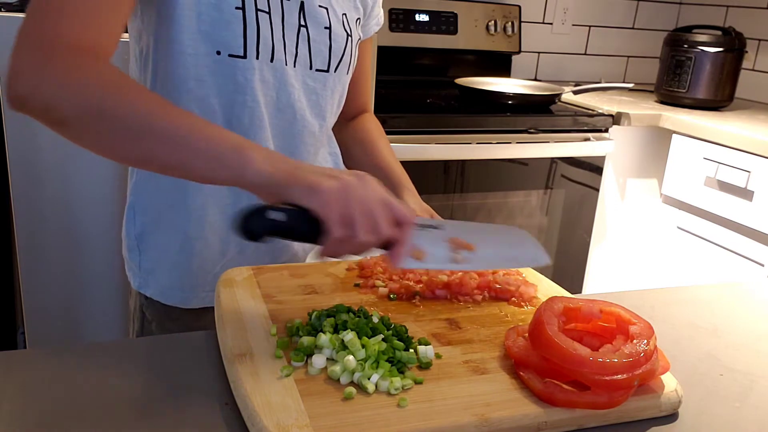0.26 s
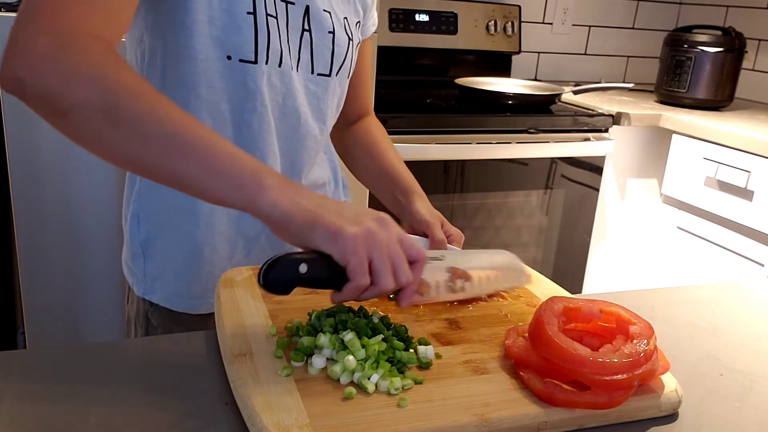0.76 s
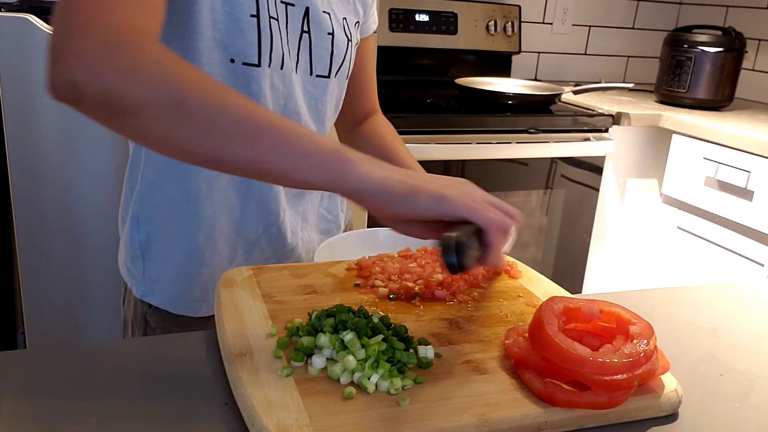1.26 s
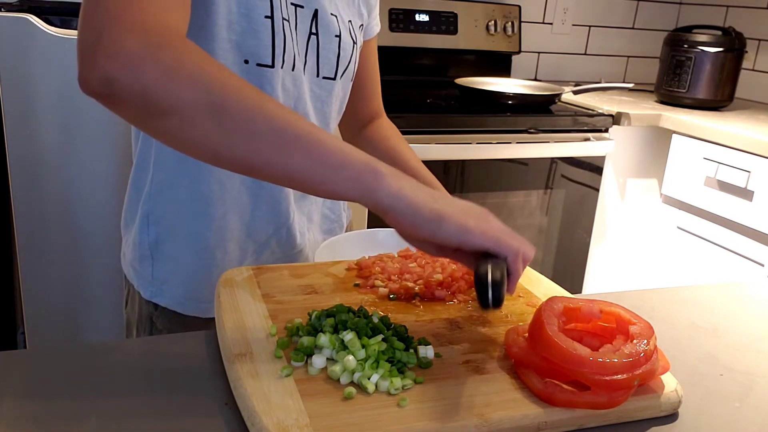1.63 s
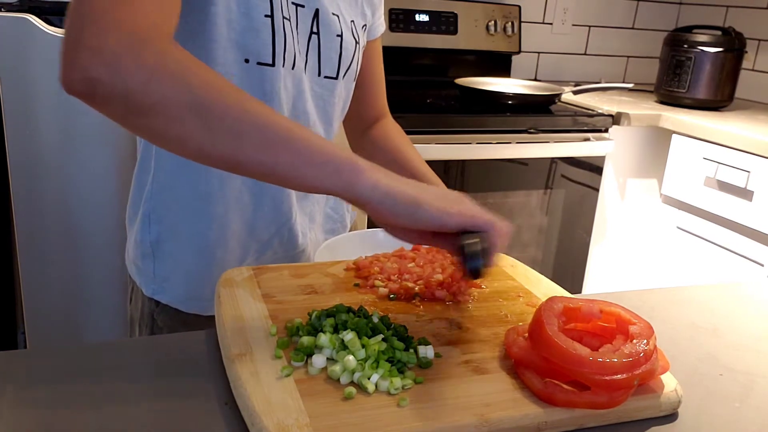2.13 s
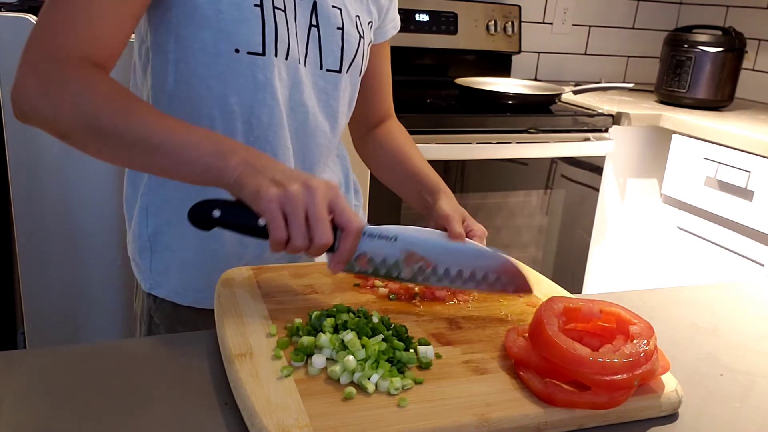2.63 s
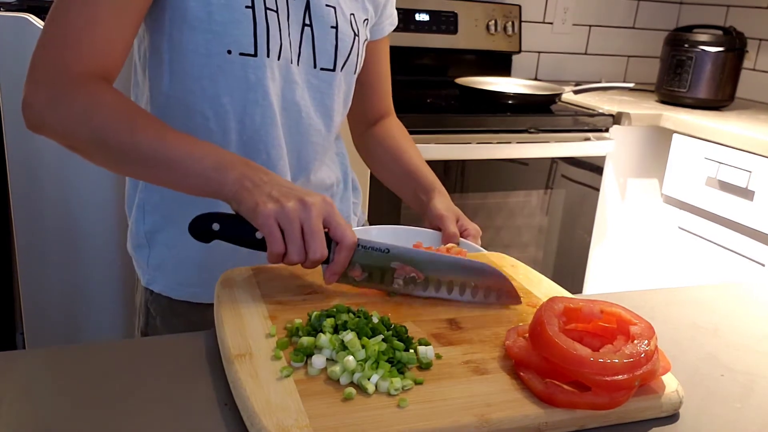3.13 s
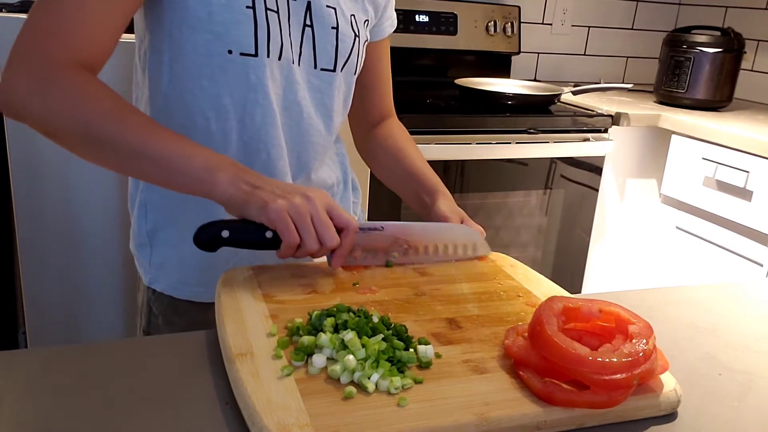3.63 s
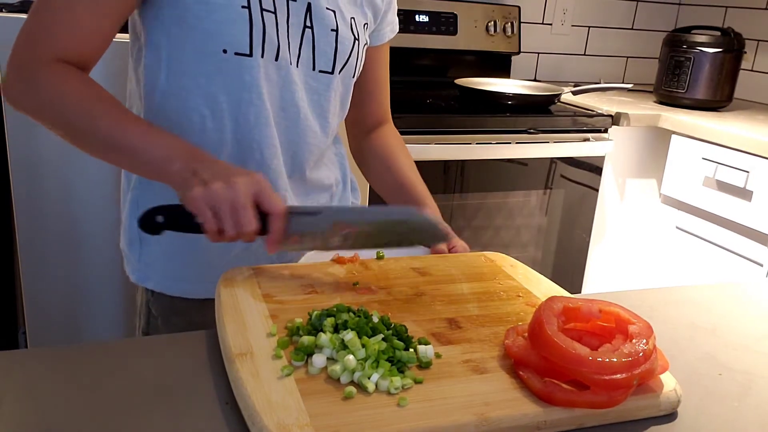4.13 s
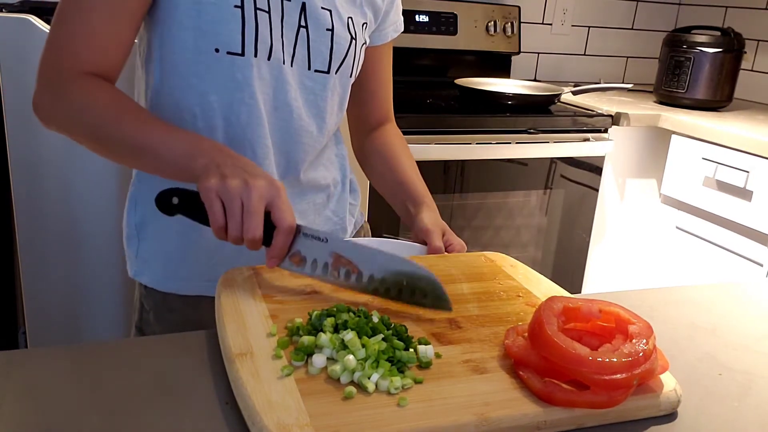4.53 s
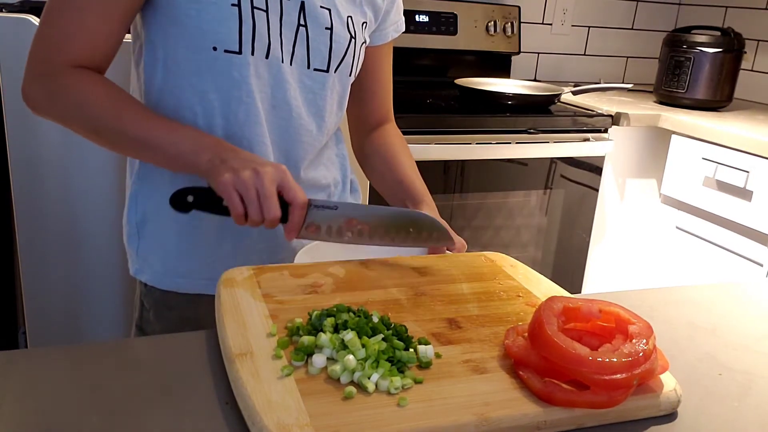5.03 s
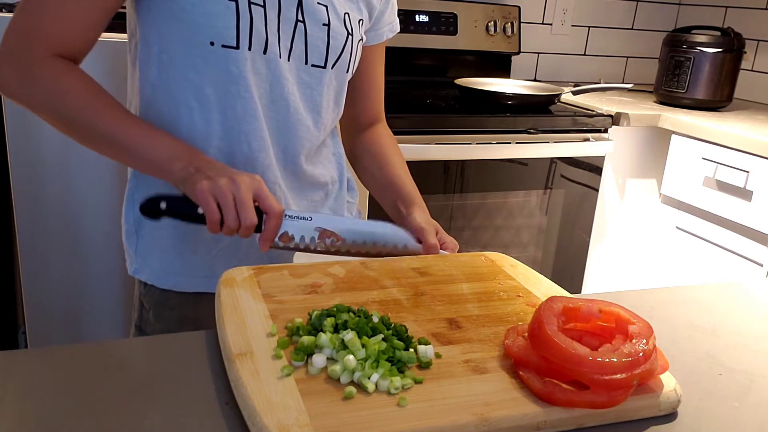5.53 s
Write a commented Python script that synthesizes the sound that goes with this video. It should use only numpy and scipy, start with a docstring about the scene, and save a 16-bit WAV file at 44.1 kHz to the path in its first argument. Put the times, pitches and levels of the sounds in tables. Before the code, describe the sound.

A knife blade rasps wetly over a wooden cutting board in short strokes, with wooden knocks and steel ticks, above a low appliance hum.

```python
"""An appliance hums and rumbles first; then a knife gathers chopped tomato and pushes it off a board onto a plate.
The hum is wavering sine tones, the rumble and faint hiss are shaped noise, and a low drone dies away early on.
Each blow is a short crack of noise: the board knocks and rings, the counter thumps, the steel ticks and sings.
The edge rasps over the wet wood as a dense run of tiny random slips.
Echoes of a small hard kitchen, made from fading noise, answer the knife."""
import sys
import numpy as np
from scipy import signal
from scipy.fft import rfft, irfft
from scipy.io import wavfile
from scipy.ndimage import uniform_filter1d

SR = 44100
rng = np.random.default_rng(int(sys.argv[2]) if len(sys.argv) > 2 else 0)


def log_audio(samples):
    """Write samples as a 16-bit WAV file to the path given in sys.argv[1]."""
    # one column per channel
    frames = np.atleast_2d(samples).T
    # limit to full scale, then quantise
    limited = np.clip(frames, -1, 1)
    pcm = np.round(limited * 32767).astype(np.int16)
    wavfile.write(sys.argv[1], SR, pcm)


N = 254661  # length in samples

# The appliance and faint hiss, as a noise spectrum: f/Hz, level/dB per Hz
AIR_SPECTRUM = [(20, -28.5), (37, -16.5), (59, -12), (85, -9), (112, -8.5), (200, -23), (240, -18.5),
                (300, -30), (520, -41), (900, -46.5), (2000, -51.5), (5500, -57.5), (7200, -51.5),
                (8800, -65), (12000, -53.5), (16000, -54.5)]
AIR_DB = -57.5  # hiss and rumble together, before the swell
# Steady hum tones: f/Hz, level/dB
HUM_TONES = [(58.8, -56.5), (117.6, -62), (156, -75), (232, -70.5)]
# Swell of the rumble and hum: t/s, level/dB
RUMBLE_SWELL = [(0, -2), (1.5, -1.5), (2.2, -4), (2.6, -2.5), (2.88, -5.5), (3.8, -3.5), (4.4, 0),
                (5.77, -2.5)]
# A low drone swells and dies away at the start
DRONE_HZ, DRONE_DB, DRONE_RISE_S, DRONE_FADE_DB_PER_S = 76.1, -49.5, 0.054, 17

# How long echoes last (time to fall by 60 dB): f/Hz, fade/s
ECHO_FADE = [(100, 0.77), (250, 0.24), (700, 0.4437), (2000, 0.4378), (5000, 0.47), (10000, 0.43),
             (16000, 0.21)]
# How alike left and right are: f/Hz, likeness (0 to 1)
LIKENESS = [(60, 0.96), (150, 0.95), (300, 0.71), (600, 0.56), (1200, 0), (3000, 0), (16000, 0)]
# How much louder the left microphone is than the right: f/Hz, difference/dB
LEFT_LEAN = [(60, 1.6), (250, 2.4), (1000, 2.4), (2000, 3.6), (4000, 2.3), (8000, 6.2), (14000, 0.26)]
TOP_HZ = 15650  # band limit of the finished sound

# Knife blows on the board: t/s, force/dB, hardness of contact as a corner f/Hz,
# board ring relative to force/dB, favoured f/Hz at the place struck
KNOCKS = [(0.6838, -51.5, 1060, 2, 740), (0.908, -55, 450, 10, 232), (0.9368, -44, 1450, 0, 1040),
          (1.2246, -53, 525, 7.5, 301), (1.627, -54.5, 800, -16, 910), (1.631, -46, 790, 3, 600),
          (2.063, -71, 1120, -6, 1000), (2.343, -54.5, 1250, -0.5, 990), (2.925, -40.5, 2600, -10, 1500),
          (2.940, -57, 2000, 3, 523), (2.955, -45, 2240, -2, 695), (3.276, -53.5, 910, -2, 397),
          (3.402, -43, 1860, -20, 1000), (3.444, -64, 358, 1, 264), (3.615, -59.5, 607, 11, 380),
          (4.6928, -34, 1880, -4, 810), (5.258, -33, 1260, 3, 447), (5.267, -41, 1290, 5, 1290),
          (5.296, -40.5, 760, 3, 243), (5.5812, -42.5, 1190, 11, 384), (5.6237, -51.5, 515, -5, 370)]
# Natural tones of the board: f/Hz, level/dB, time to fall by 60 dB/s
BOARD_MODES = [(125, -16, .4), (234, -4, .45), (323, -5, .5), (363, -8, .35), (393, -6, .42), (469, 1, .26),
               (581, -7, .22), (669, -8, .2), (709, -6, .16), (791, -9, .3), (870, -13, .16),
               (1000, -9, .13), (1130, -5, .18), (1203, -5, .2), (1330, -7, .24), (1605, -5, .12),
               (1765, -9, .15), (2024, -9, .16), (2620, -9, .1)]
# Colour of the wooden knock: f/Hz, level/dB per Hz
WOOD_SPECTRUM = [(60, -24), (200, -3), (450, -1.5), (1000, 2), (1700, 0.5), (2700, -1.5), (3900, -16),
                 (4600, -11.5), (8000, -19), (16000, -24)]
# Colour of the counter thump: f/Hz, level/dB per Hz
THUMP_SPECTRUM = [(30, -52), (80, 1), (140, -1.5), (250, 2.5), (400, -3.5), (800, -26.5), (3000, -67)]
# Thump relative to force at a hardness of 1 kHz, and its change per octave: softer blows thump more
THUMP_DB, THUMP_DB_PER_OCTAVE = -1.5, -12.5

# Jars of the blade: t/s, level/dB, damping by hand and wood (factor on fade times),
# favoured f/Hz at the place struck
RINGS = [(0.6824, -56, 0.1, 3900), (0.9369, -36, 0.81, 1610), (0.947, -41.5, 0.39, 6150),
         (2.343, -50, 0.75, 3870), (2.928, -70, 0.44, 4400), (3.404, -43.5, 0.2, 3230),
         (4.6935, -52, 0.29, 3330), (5.258, -51.5, 0.076, 1900), (5.297, -52, 0.27, 5200),
         (5.6231, -58.5, 0.04, 4650)]
# Natural tones of the steel: f/Hz, level/dB, time to fall by 60 dB/s
BLADE_MODES = [(738, -5, .46), (1012, -4, .3), (1728, 0, .56), (1765, -8, .36), (1916, -10, .22),
               (3004, -2, .38), (3390, -5, .24), (3600, -6, .26), (4455, 0.5, .48), (4545, -5, .34),
               (5529, -10, .46), (6024, -6, .46), (6890, -12, .36), (7720, -9, .4), (8349, -11, .33),
               (9308, -13, .2), (9868, -15, .3), (10990, -15, .3), (12760, -18, .28), (13710, -15, .28)]
# Colour of the steel's tick: f/Hz, level/dB per Hz
TICK_SPECTRUM = [(200, -10), (900, -1), (2400, 13.5), (3600, 10), (4600, 4), (6000, 7), (9000, 0),
                 (12000, 1), (16000, 2)]
# Broad resonances of the hand-held blade in its tick: f/Hz, width/Hz, added level/dB
TICK_PEAKS = [(1000, 240, 4), (3340, 360, 3.5), (4380, 390, 8.5)]
TICK_DB = -8.5  # relative to the ring

# Strokes of the edge: start t/s, length/s, time to bite/s, final level/dB,
# rise over the stroke/dB (negative falls), final brightness/dB per octave, hold of the blade
STROKES = [(0.678, 0.23, 0.0057, -48, 3, 4, "leaning"), (0.935, 0.041, 0.0079, -47.5, -15, 4.5, "leaning"),
           (1.631, 0.016, 0.004, -54, -7, 8.5, "loaded"), (1.65, 0.015, 0.0053, -52, 9, 4, "loaded"),
           (1.998, 0.045, 0.027, -63.5, -4, 7, "loaded"), (3.062, 0.325, 0.069, -54.5, -3.5, 0.1, "loaded"),
           (3.384, 0.17, 0.0088, -48.5, 4.5, -0.3, "loaded"),
           (3.554, 0.066, 0.017, -42.5, 8.5, 0.24, "loaded"),
           (4.753, 0.26, 0.056, -36, 10.5, 0.84, "sweeping"),
           (5.274, 0.035, 0.0072, -37.5, 8, 1, "flicking"), (5.603, 0.036, 0.0058, -58, 0.5, 4, "loaded")]
# Grain of each hold: slips/per s, chatter/dB, bounce strength (0 to 1),
# brightening over the stroke as the blade rolls upright/dB per octave
GRAIN = {"leaning": (2400, 2.3, 0.062, 7.3), "loaded": (1600, 2.7, 0.13, 0.1),
         "sweeping": (2400, 0.93, 0.4, 0.08), "flicking": (2000, 1.9, 0.15, 0.1)}
# Rasp colour, blade leaning: f/Hz, level/dB per Hz
LEANING_SPECTRUM = [(100, -31), (400, -8), (750, 1.5), (1150, -2), (1500, -4), (2100, -5.5), (3000, -12),
                    (3500, -5.5), (4200, -3.5), (5300, -4), (7000, -4.5), (9000, -8.5), (12000, -8),
                    (16000, -7.5)]
# Rasp colour, blade loaded with tomato: f/Hz, level/dB per Hz
LOADED_SPECTRUM = [(100, -19), (250, -8), (450, -0.5), (700, -5), (950, -3.5), (1300, -7), (2000, -2.5),
                   (2500, -7), (3200, -4.5), (5000, -8.5), (8500, -14.5), (11500, -12.5), (16000, -14)]
# Rasp colour, blade bare: f/Hz, level/dB per Hz
BARE_SPECTRUM = [(100, -7), (330, 9), (520, 2.5), (720, 7), (1150, -7), (1500, 2), (2050, 2.5), (2600, 2),
                 (3800, 4.5), (6000, -0.5), (8800, -5.5), (11000, 2.5), (13000, 2.5), (16000, -1)]
# Resonances of the leaning blade pressed on the wood: f/Hz, width/Hz, added level/dB
LEANING_PEAKS = [(760, 35, 3), (1127, 36, 6.5), (3680, 190, 10.5), (7200, 150, -12)]
# Resonances of the loaded blade: f/Hz, width/Hz, added level/dB
LOADED_PEAKS = [(450, 35, 5.5), (3260, 120, -26), (4520, 35, -1), (11400, 340, -4)]
# Resonances of the bare blade in a sweep: f/Hz, width/Hz, added level/dB
SWEEP_PEAKS = [(525.6, 21, 20), (1191, 58, 16), (1950, 100, -6), (3280, 30, -19), (3630, 63, -22),
               (6100, 110, -28), (10900, 120, -13), (11100, 340, -11)]
# Resonances of the bare blade in a flick: f/Hz, width/Hz, added level/dB
FLICK_PEAKS = [(2600, 110, -8), (3300, 110, -11), (4900, 96, 6), (6000, 75, -15), (6930, 170, 7),
               (9400, 110, 5), (11900, 170, 1)]
RELEASE_S, RELEASE_DB = 0.0335, -33  # the edge lets go: this drop over this time


def gain_of(db):
    """Turns decibels into an amplitude factor."""
    return 10 ** (np.asarray(db) / 20)


def evened(x):
    """Scales a sound to an average (rms) strength of 1."""
    return x / np.sqrt(np.mean(x ** 2) + 1e-20)


def blow(x):
    """Scales a decaying sound so that its energy equals an rms of 1 held for 30 ms."""
    return x / np.sqrt(np.sum(x ** 2) / (.03 * SR))


def read(points, hz):
    """Reads a table between its points, with frequency spaced by octaves as in hearing."""
    f, value = np.transpose(points)
    return np.interp(np.log(hz + 1), np.log(f + 1), value)


def add(mix, s, sound):
    """Mixes a sound in at time s, cut off at the end of the mix."""
    part = mix[..., round(s * SR):][..., :sound.shape[-1]]
    part += sound[..., :part.shape[-1]]


def colour(x, points):
    """Filters by a spectrum without ringing ahead of a click (minimum phase)."""
    hz = abs(np.fft.fftfreq(4096, 1 / SR))
    log_gain = np.log(gain_of(read(points, hz)))
    taps = np.fft.ifft(np.exp(np.conj(signal.hilbert(log_gain)))).real[:2048]
    return signal.oaconvolve(x, taps)[:len(x)]


def boosted(x, peaks):
    """Adds narrow resonances on top of a sound."""
    out = x.copy()
    for hz, width, db in peaks:
        b, a = signal.iirpeak(hz, hz / width, fs=SR)
        out += gain_of(db) * signal.lfilter(b, a, x)
    return out


def pair(z, hz):
    """Makes two unrelated spectra alike in the bass, as at two close microphones."""
    same = np.clip(read(LIKENESS, hz), -1, 1)[:, None]
    return np.array([z[0], same * z[0] + np.sqrt(1 - same ** 2) * z[1]])


def waver(t):
    """Slow random drift through 48 evenly spaced points."""
    knots = np.linspace(0, t[-1], num=48)
    return np.interp(t, knots, rng.standard_normal(len(knots)))


def tone(hz, t):
    """A sine of rms near 1 whose phase and level drift a little."""
    phase = 2 * np.pi * hz * t + 0.4 * waver(t)
    return np.sqrt(2) * np.sin(phase) * gain_of(1.6 * waver(t))


def background():
    """An appliance hums and rumbles, swelling together, under a faint even hiss."""
    t = np.arange(N) / SR
    hz, _, z = signal.stft(rng.standard_normal((2, N)), SR, nperseg=4096)
    shaped = pair(z, hz) * gain_of(read(AIR_SPECTRUM, hz))[:, None]
    air = gain_of(AIR_DB) * evened(signal.istft(shaped, SR, nperseg=4096)[1][:, :N])
    rumble = signal.sosfiltfilt(signal.butter(2, 350, fs=SR, output="sos"), air)
    hiss = air - rumble
    hum = sum(gain_of(db) * tone(f, t) for f, db in HUM_TONES)
    swell = gain_of(np.interp(t, *np.transpose(RUMBLE_SWELL)))
    drone_level = np.minimum(t / DRONE_RISE_S, 1) * gain_of(DRONE_DB - DRONE_FADE_DB_PER_S * t)
    return hiss + (rumble + hum) * swell + drone_level * tone(DRONE_HZ, t)


def kitchen(x, wet_db):
    """Direct sound, a sample earlier on the left, and dense echoes from counter, tiles and cupboards."""
    left, right = np.broadcast_to(x, (2, N))
    hz, t, z = signal.stft(rng.standard_normal((2, SR * 3 // 4)), SR, nperseg=256)
    fade = gain_of(-60 * t / read(ECHO_FADE, hz)[:, None])
    tail = signal.istft(pair(z, hz) * fade, SR, nperseg=256)[1]
    # echoes start after 1.5 ms and build up over 8.1 ms
    tail *= np.clip((np.arange(tail.shape[1]) / SR - .0015) / 0.0081, 0, 1)
    echoes = signal.fftconvolve(left[None], tail / np.linalg.norm(tail[0]), axes=1)[:, :N]
    direct = np.array([left, np.roll(right, 1)])
    wet = gain_of(wet_db)
    return (direct + wet * echoes) / np.sqrt(1 + wet ** 2)


def ring(modes, t, favoured_hz, favour_db, scatter_db, corner_hz):
    """Dying tones; the place struck favours some, and a soft contact weakens those above its corner."""
    out = np.zeros((2, len(t)))
    for hz, db, t60 in modes:
        near = np.exp(-(np.log2(hz / favoured_hz) / 0.69) ** 2)
        scatter = scatter_db * rng.standard_normal()
        size = gain_of(db + favour_db * near + scatter - 60 * t / t60)
        size /= np.sqrt(1 + (hz / corner_hz) ** 6)
        # high tones reach the two sides out of step
        apart = np.arccos(np.clip(read(LIKENESS, hz), 0, 1)) * rng.choice([-.5, .5])
        phase = 2 * np.pi * (hz * t + rng.random())
        out += size * np.sin(phase + np.array([[apart], [-apart]]))
    return out * (1 - np.exp(-t / 0.0019))  # soft start, 1.9 ms


def crack(t, t60, snap):
    """One sharp impulse on top of a fading burst of noise, like a crowd of short, dense modes."""
    crowd = rng.standard_normal(len(t)) * gain_of(-60 * t / t60)
    return crowd / np.linalg.norm(crowd) + snap * (t == 0)


def board():
    """Every blow leaves the wooden board ringing in its natural tones."""
    out, t = np.zeros((2, N)), np.arange(SR * 3 // 4) / SR
    for s, db, corner_hz, ring_db, favoured_hz in KNOCKS:
        tones = ring(BOARD_MODES, t, favoured_hz, favour_db=16.5, scatter_db=0.5, corner_hz=corner_hz)
        add(out, s, gain_of(db + ring_db) * blow(tones))
    return out


def knocks():
    """Wood clacks as brightly as the contact is hard; a softer one pushes longer and thumps the counter."""
    out, t = np.zeros(N), np.arange(SR // 2) / SR
    for s, db, corner_hz, _, _ in KNOCKS:
        wood = colour(crack(t, t60=0.038, snap=0.54), WOOD_SPECTRUM)
        wood = signal.sosfilt(signal.butter(3, corner_hz, fs=SR, output="sos"), wood)
        thump = colour(crack(t, t60=0.29, snap=0.93), THUMP_SPECTRUM)
        thump_db = THUMP_DB + THUMP_DB_PER_OCTAVE * np.log2(corner_hz / 1000)
        add(out, s, gain_of(db) * (blow(wood) + gain_of(thump_db) * blow(thump)))
    return out


def ticks():
    """The steel ticks each time it is jarred: a crack coloured by the hand-held blade."""
    out, t = np.zeros(N), np.arange(SR // 2) / SR
    for s, db, _, _ in RINGS:
        tick = boosted(colour(crack(t, t60=0.12, snap=0.32), TICK_SPECTRUM), TICK_PEAKS)
        add(out, s, gain_of(db + TICK_DB) * blow(tick))
    return out


def blade():
    """The steel sings in its natural tones, more briefly when hand and wood damp it."""
    out, t = np.zeros((2, N)), np.arange(SR * 3 // 4) / SR
    for s, db, damping, favoured_hz in RINGS:
        modes = [(hz, mode_db, t60 * damping) for hz, mode_db, t60 in BLADE_MODES]
        tones = ring(modes, t, favoured_hz, favour_db=5, scatter_db=1, corner_hz=15000)
        add(out, s, gain_of(db) * blow(tones))
    return out


def unevenness(t, size):
    """Random pressure wobble, smoothed over size samples and kept within -1 to 1."""
    smooth = uniform_filter1d(rng.standard_normal(len(t)), size=size, mode="wrap")
    return np.tanh(np.sqrt(size) * smooth)


def scrape(length_s, bite_s, level_db, rise_db, bright_db, spectrum, peaks,
           slips_per_s, chatter_db, bounce, roll_db):
    """The edge catches on wood fibres and pulp: tiny slips, clumped by chatter, sound through the blade."""
    t = np.arange(0, length_s + RELEASE_S, 1 / SR)
    # the edge bites, the hand presses steadily harder or softer, then lets go
    to_go = np.maximum(1 - t / length_s, 0)
    release_db = RELEASE_DB * np.maximum(t - length_s, 0) / RELEASE_S
    envelope = np.minimum(t / bite_s, 1) ** 2 * gain_of(level_db - rise_db * to_go + release_db)
    # slips of random size and direction at random moments, over a little steady noise
    size = gain_of(3 * np.minimum(rng.exponential(1, len(t)), 3)) * rng.choice([-1, 1], len(t))
    slips = evened(size * (rng.random(len(t)) < slips_per_s / SR)) + 0.18 * rng.standard_normal(len(t))
    # the blade chatters quickly, and lumps of tomato drag on it more slowly
    pressure_db = chatter_db * (unevenness(t, size=200) + 0.49 * unevenness(t, size=1000))
    rasp = boosted(colour(slips * gain_of(pressure_db), spectrum), peaks)
    # the bounce between blade and board lengthens as the knife rolls over, so bands of the rasp slide down
    delay_s = np.geomspace(.0007, .0013, len(t))
    rasp = rasp + bounce * np.interp(t - delay_s, t, rasp, left=0)
    # a more upright blade is brighter: treble tilts up around 3 kHz
    tilt_db = bright_db - roll_db * to_go
    hz, at, z = signal.stft(evened(rasp), SR, nperseg=256)
    octaves = np.log2(np.maximum(hz, 400) / 3000)[:, None]
    tilted = z * gain_of(octaves * np.interp(at, t, tilt_db))
    return envelope * evened(signal.istft(tilted, SR, nperseg=256)[1][:len(t)])


def scrapes():
    """All strokes: wet and smooth under a load of tomato, drier on the cleared board."""
    holds = {"leaning": (LEANING_SPECTRUM, LEANING_PEAKS), "loaded": (LOADED_SPECTRUM, LOADED_PEAKS),
             "sweeping": (BARE_SPECTRUM, SWEEP_PEAKS), "flicking": (BARE_SPECTRUM, FLICK_PEAKS)}
    out = np.zeros(N)
    for s, *stroke, hold in STROKES:
        add(out, s, scrape(*stroke, *holds[hold], *GRAIN[hold]))
    return out


def scene():
    """Board, blade and scraping in the kitchen, over the appliance; wet_db is echo against direct sound."""
    blows = kitchen(knocks() + ticks(), wet_db=2.5) + kitchen(board(), wet_db=-9.5)
    steel = kitchen(blade(), wet_db=-7)
    rasps = kitchen(scrapes(), wet_db=1.5)
    return background() + blows + steel + rasps


def record(dry):
    """The left microphone hears a little more; then the highest treble is cut off."""
    lean_db = read(LEFT_LEAN, np.fft.rfftfreq(N, 1 / SR)) / 2  # half up on the left, half down on the right
    heard = irfft(rfft(dry) * gain_of([lean_db, -lean_db]), N)
    low_pass = signal.firwin(511, TOP_HZ, window=("kaiser", 9), fs=SR)
    return signal.oaconvolve(heard, low_pass[None], "same")


dry = scene()
out = record(dry)
log_audio(out)
```